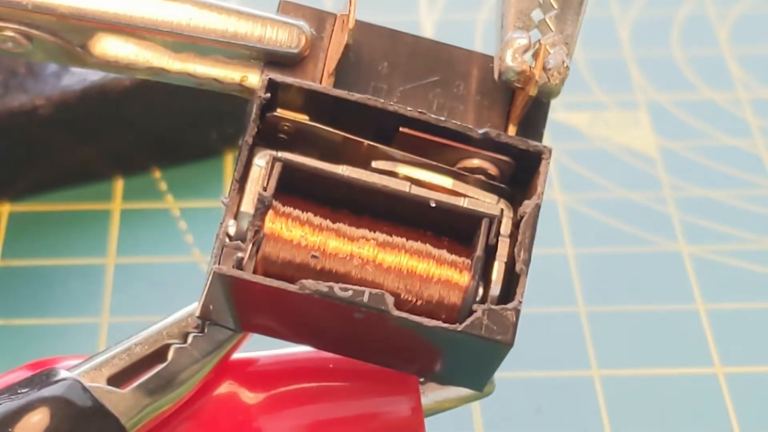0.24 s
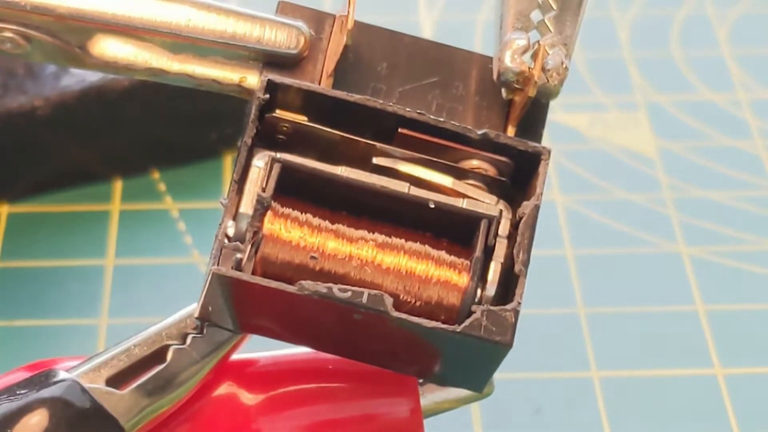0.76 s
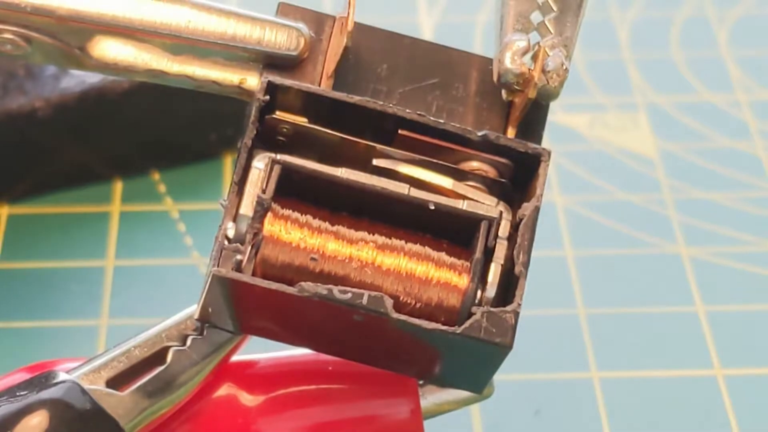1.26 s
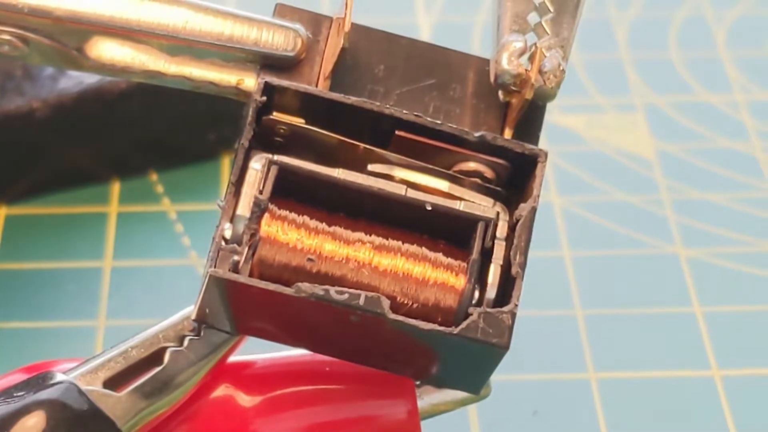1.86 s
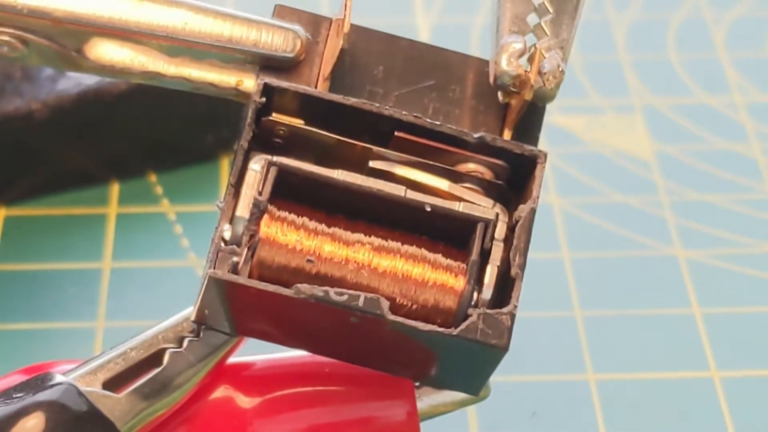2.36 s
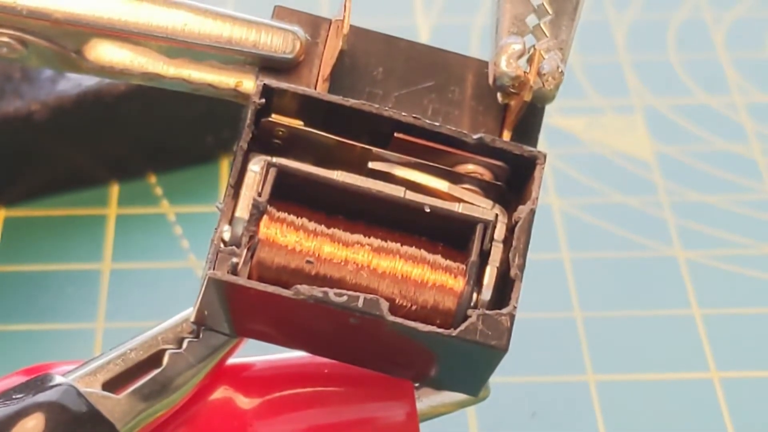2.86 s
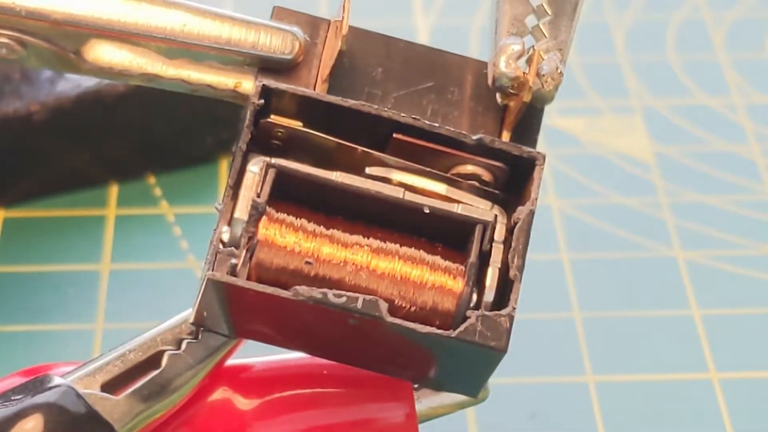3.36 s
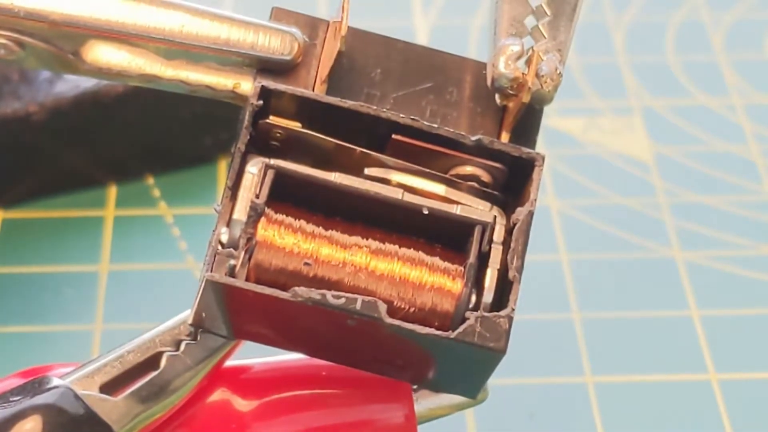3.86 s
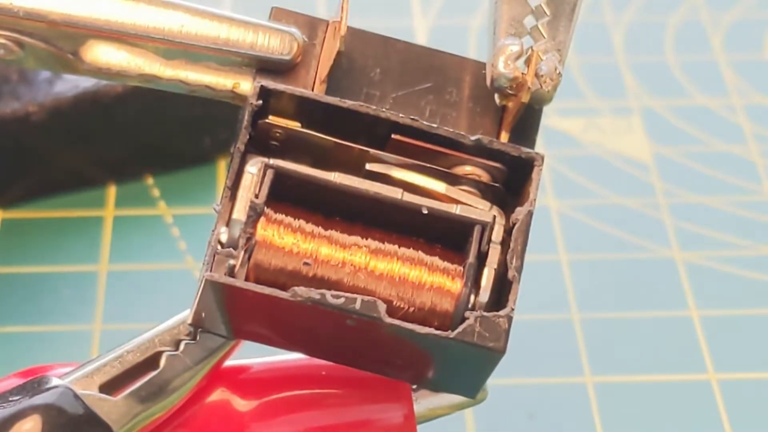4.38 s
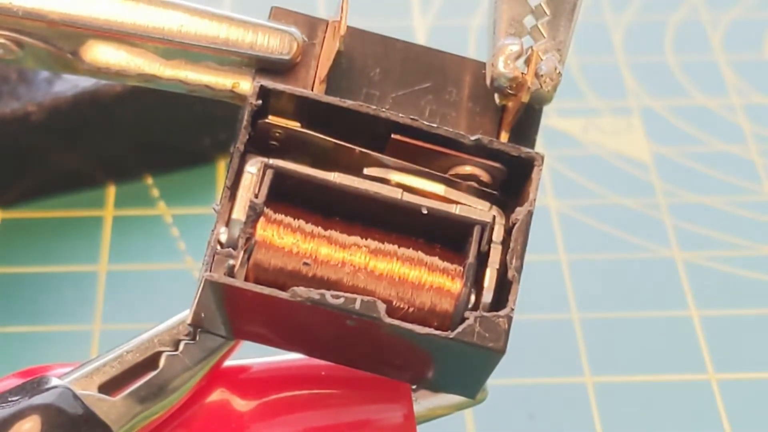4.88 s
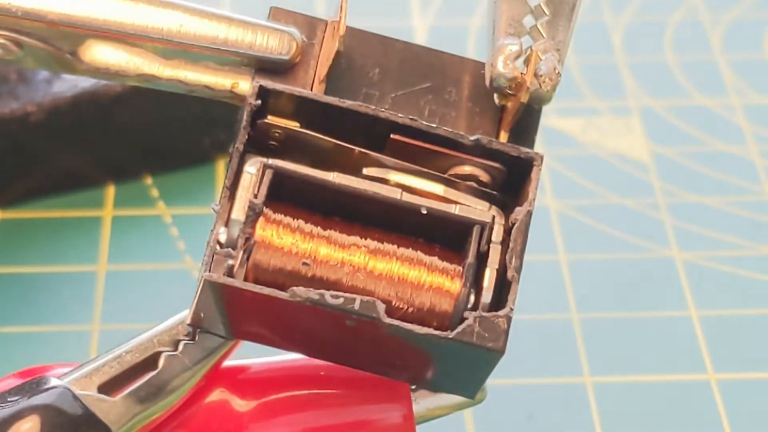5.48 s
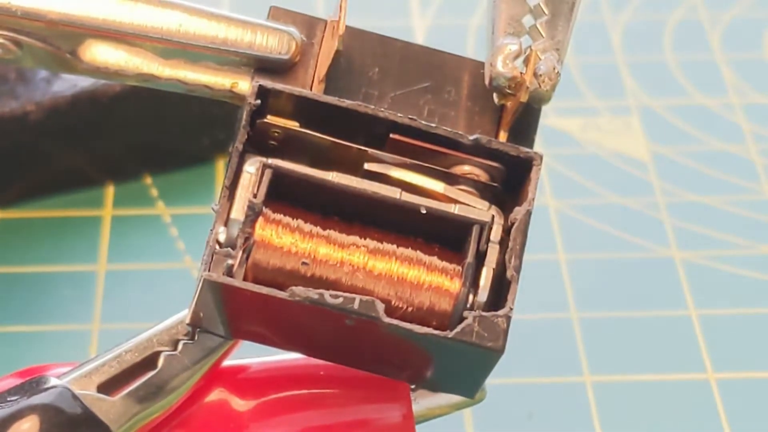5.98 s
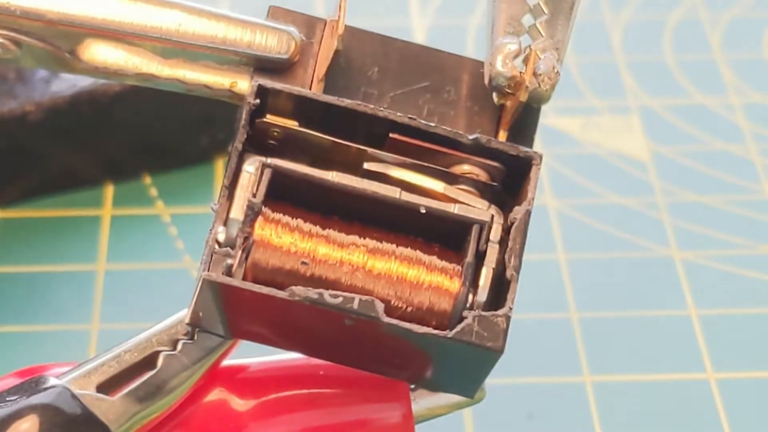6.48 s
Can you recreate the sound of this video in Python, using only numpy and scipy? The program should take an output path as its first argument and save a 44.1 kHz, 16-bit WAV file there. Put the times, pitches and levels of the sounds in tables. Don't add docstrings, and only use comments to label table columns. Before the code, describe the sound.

A fan drones evenly in a small, hard room while a push switch and relay click close to two spaced microphones. Each of four cycles lasts just over a second: sharp switch snap, tinny armature slam with ringing small parts, quieter thuddy switch release, then a dry clack with quick bounces. The opening pair is heaviest, with a low bench thump; short pauses leave only drone and faint hiss.

```python
import sys
import numpy as np
from scipy import signal
from scipy.fft import rfft, irfft, next_fast_len
from scipy.io import wavfile
from scipy.ndimage import uniform_filter1d, map_coordinates

SR = 44100
rng = np.random.default_rng(int(sys.argv[2]) if len(sys.argv) > 2 else 0)


def int16_out(signal):
    q = np.round(np.clip(np.atleast_2d(signal).T, -1, 1) * 32767)
    wavfile.write(sys.argv[1], SR, q.astype(np.int16))


def magnitude_from_level(level_db):
    exponent = np.asarray(level_db, float) / 20
    return 10 ** exponent


N = 296793
CLICK_N = 22050
AHEAD_N = 2000
SPACING_N = 20
JOINT_HZ, TOP_HZ = 6300, 15900
FAN_DB, HISS_DB = -43, -68
EARLY_DB, SETTLE_S, SETTLE_SPREAD_S = 4, 1.3, 0.037

# f/Hz, density/(dB per Hz)
FAN_COLOUR = [(32, -42), (55, -20), (85, -35), (103, -16.5), (167, -10.5), (202, -10.5), (233, -10.5),
              (353, -10.5), (385, -13.5), (545, -1.5), (595, -7), (827, -15), (1020, -14.5), (1570, -18.5),
              (3500, -42), (4550, -45), (7700, -120)]
# f/Hz, width/Hz, level/dB
DUCT_MODES = [(119.2, 8.2, 7.5), (171.9, 16.6, 11), (230.7, 14.4, 10.5), (306.5, 66, 4), (539.5, 29, 7),
              (636, 20.4, 8.5), (824, 28, 8.5), (1580, 15.5, 9), (2330, 34, 11.5)]
# f/Hz, density/(dB per Hz)
HISS_COLOUR = [(1470, -51), (2500, 2), (3710, -4.5), (4410, -5), (7030, -5.5), (9130, -13), (11500, -11),
               (15700, -23), (16500, -37.5)]
# f/Hz, share/1
AIR_SHARE = [(60, .82), (170, .88), (300, .86), (450, .72), (540, .9), (700, .55), (1000, .9), (1300, .85),
             (1900, .5), (3000, .2), (8000, .15)]
# f/Hz, phase/rad
AIR_LEAD = [(30, .05), (400, .2), (540, .35), (700, 1.1), (850, 2.1), (1000, 3), (1500, 3.6), (2240, 6.6),
            (3500, 6)]
# f/Hz, level/dB
AIR_BALANCE = [(200, 0), (500, 1), (1600, 1.2), (2100, -1.5), (3500, 1), (6000, .2)]
# f/Hz, level/dB rms
MAINS_LINES = [(45, -74.5)]
# t/s, level/dB, length/s
HAND_BRUSH = [
    (3.874, -65, .05),
]

# t/s, peak level/dB, bench knock re peak/dB, noise swell ahead/s, brightness/(dB per octave)
PRESS_EVENTS = [
    (0.5439, -16.5, -20.5, 0.021, -2.5),
    (2.171, -18.5, -58, 0.0034, 1.5),
    (3.986, -20, -45.5, .025, 2.5),
    (5.6634, -20.5, -55, .021, 1.5),
]
PULL_EVENTS = [
    (0.7265, -23.5, 2, 0.015, 0.073),
    (2.3153, -23.5, -35, 0.025, 0.1),
    (4.131, -23, -39, 0.024, 0.1),
    (5.8112, -24, -18, 0.011, 0.16),
]
RELEASE_EVENTS = [
    (1.237, -36.5, 9, 0.02, 0.1),
    (2.9614, -37.5, 12.5, 0.029, 0.1),
    (4.655, -37.5, 11, 0.015, 0.1),
    (6.377, -37.5, 12, 0.022, 0.1),
]
DROP_EVENTS = [
    (1.487, -25.5, -14, 0.028, 0.1),
    (3.2163, -25.5, -15, 0.028, 0.1),
    (4.9292, -25, -10.5, 0.019, 0.1),
    (6.6313, -25, -17.5, 0.028, 0.1),
]

# t after first/s, level/dB
PRESS_CONTACTS = [
    (0, -8),
    (.0013, 3),
    (.003, -5),
    (.0055, -10),
    (.009, -14),
]
PULL_CONTACTS = [
    (0, 4),
    (.0012, 2),
    (.0028, -4),
    (.009, -9),
    (.017, -13),
    (.026, -14),
    (.055, -20),
]
RELEASE_CONTACTS = [
    (-.002, -8),
    (0, 1),
    (.003, 0),
    (.007, -3),
    (.012, -5),
    (.018, -7),
]
DROP_CONTACTS = [
    (0, 2),
    (.0015, 1),
    (.0055, 1),
    (.009, -4),
    (.013, -1),
    (.017, -6),
]

# f/Hz, density/(dB per Hz)
PRESS_CRACK = [(1470, -37), (2500, -16), (3270, -22), (3680, -19.5), (4700, -4.5), (5900, -3.5),
               (6400, -8.5), (7980, -1), (8770, -4.5), (14000, -11.5), (15700, -22.5), (16500, -34.5)]
PULL_CRACK = [(590, -70), (1000, -17), (1950, -6), (2680, -2.5), (2910, 4), (3160, -5.5), (4820, -6.5),
              (7010, -3.5), (8360, -4.5), (14000, -15), (15900, -32), (16500, -68)]
RELEASE_CRACK = [(3120, -6), (5300, -7.5), (9020, 1.5), (10100, 1), (15100, -4.5), (16100, -9),
                 (16500, -37)]
DROP_CRACK = [(1290, -57), (2200, -21), (2760, -6), (3240, -31), (4540, -8.5), (6360, -7), (7040, 1),
              (8840, -4.5), (10700, 0), (12500, -5), (13600, -5), (16000, -15), (16500, -36.5)]

# f/Hz, level/dB, t60/s
PRESS_MODES = [(5300, -2, 0.026), (5610, -20, 0.13), (6750, -7.5, 0.038), (7730, -20, 0.043),
               (8100, -15.5, 0.074), (9700, -4, 0.029), (11800, -22, 0.15), (13500, -3.5, 0.023)]
PULL_MODES = [(2480, -24, 0.06), (2810, -30, 0.04), (4650, -15, 0.076), (5420, -20, 0.091),
              (6870, -7, 0.26), (7180, 5.5, 0.05), (7500, -20, 0.21), (8100, -17, 0.43), (7800, -10, 0.28),
              (8800, -4.5, 0.15), (9220, -18, 0.21), (9460, -14.5, 0.19), (11900, -11, 0.1),
              (13800, -19, 0.13)]
RELEASE_MODES = [(5800, -4, 0.027), (7460, -3, 0.033), (8700, 0, 0.065), (11900, -11, 0.053)]
DROP_MODES = [(5400, -13, 0.061), (6920, -5.5, 0.035), (7230, -14, 0.034), (7860, -18, 0.23),
              (9500, -19, .04), (10540, -8, 0.057), (12100, -20, .06), (14100, -6, .04)]

# f/Hz, density/(dB per Hz)
PRESS_BENCH = [(71, -43), (120, -7.5), (358, -3.5), (823, 1), (958, -8), (1260, 0.5), (1440, -6.5),
               (1870, -1.5), (3030, -16), (4500, -20), (5850, -46), (9900, -120)]
PULL_BENCH = [(82, -46), (140, -20), (214, -9.5), (461, -10.5), (620, -10), (781, -13), (983, -18),
              (1370, -15.5), (3000, -19), (3900, -67), (6600, -120)]
SOFT_BENCH = [(150, -83), (350, -5), (550, 8), (900, -2.5), (1500, -15.5), (2500, -20.5), (3500, -35)]

# f/Hz, t60/s
BENCH_DECAY = [(110, 0.19), (180, 0.16), (400, 0.031), (1500, 0.047), (4000, 0.098)]
# f/Hz, t60/s
ROOM_DECAY = [(1000, 0.29), (3000, 0.33), (7500, 0.39), (11000, 0.29), (16000, 0.2)]
# t/s, f/Hz, level/dB, t60/s
BENCH_THUDS = [
    (.76, 118, -39, 0.61),
    (.727, 186, -23, 0.17),
    (.546, 338, -22, 0.063),
]
# f/Hz, width/Hz, level/dB
BENCH_REFLECTION = [(6200, 500, -2), (8620, 340, -8.5), (9950, 460, -4), (12800, 610, -1.5),
                    (14900, 450, 4), (16400, 900, -3)]


def along(points, hz):
    f, v = np.transpose(points)
    return np.interp(np.log(hz + 1), np.log(f + 1), v)


def bells(table, hz):
    return sum(db / (1 + ((hz - c) / (w / 2)) ** 2) for c, w, db in table)


def unit(x):
    return x / np.sqrt(np.mean(x ** 2) + 1e-20)


def filtered(x, response):
    m = next_fast_len(x.shape[-1] + 8192)
    spectrum = rfft(x, m) * response(np.fft.rfftfreq(m, 1 / SR))
    return irfft(spectrum, m)[..., :x.shape[-1]]


def wobble(rate_hz, count=N):
    knots = rng.standard_normal(int(count * rate_hz / SR) + 4)
    return map_coordinates(knots, [np.arange(count) * rate_hz / SR])


def pair(alike, count):
    a, b = rng.standard_normal((2, count))
    turn = np.arccos(np.clip(alike, -1, 1)) / 2
    return np.array([np.cos(turn) * a + np.sin(turn) * b, np.cos(turn) * a - np.sin(turn) * b])


def air(colour):
    shared, left, right = rng.standard_normal((3, N))

    def share(hz):
        return np.clip(along(AIR_SHARE, hz), 0, 1)

    def turn(hz):
        return np.exp(.5j * along(AIR_LEAD, hz) * [[1], [-1]])

    both = filtered(shared, lambda hz: colour(hz) * np.sqrt(share(hz)) * turn(hz))
    both = both + filtered(np.array([left, right]), lambda hz: colour(hz) * np.sqrt(1 - share(hz)))
    both = filtered(both, lambda hz: magnitude_from_level(along(AIR_BALANCE, hz) / 2 * [[1], [-1]]))
    return both / np.sqrt(np.mean(both.mean(axis=0) ** 2))


def fan():
    t = np.arange(N) / SR
    drone = air(lambda hz: magnitude_from_level(along(FAN_COLOUR, hz) + bells(DUCT_MODES, hz)))
    drone = drone * magnitude_from_level(FAN_DB + 0.74 * wobble(7))
    early_db = EARLY_DB / (1 + np.exp((t - SETTLE_S) / SETTLE_SPREAD_S))
    hiss = air(lambda hz: magnitude_from_level(along(HISS_COLOUR, hz))) * magnitude_from_level(HISS_DB + early_db)
    mains = sum(magnitude_from_level(db) * np.sqrt(2) * np.sin(2 * np.pi * hz * t + .3 * wobble(3)) for hz, db in MAINS_LINES)
    stroke = sum(magnitude_from_level(db) * np.exp(-((t - at) / (length / 2)) ** 2) for at, db, length in HAND_BRUSH)
    brush = stroke * filtered(pair(.5, count=N), lambda hz: hz ** 2 / (hz ** 2 + 6600.0 ** 2))
    return drone + mains + hiss + brush


def causal(x, colour, size=2048):
    gain = magnitude_from_level(along(colour, np.fft.rfftfreq(size, 1 / SR)))
    cepstrum = irfft(np.log(np.maximum(gain, 1e-4)))
    cepstrum[1:size // 2] *= 2
    cepstrum[size // 2 + 1:] = 0
    kernel = irfft(np.exp(rfft(cepstrum)))
    return signal.fftconvolve(x, kernel[None] / np.linalg.norm(kernel), axes=1)[:, :x.shape[1]]


def patchy(x, depth_db):
    z = signal.stft(x, nperseg=256)[2]
    field = uniform_filter1d(rng.standard_normal(z.shape[1:]), size=3, axis=0)
    field = uniform_filter1d(field, size=5, axis=1)
    return signal.istft(z * magnitude_from_level(depth_db * unit(field)), nperseg=256)[1][:, :x.shape[1]]


def dying(t60s, alike):
    hz, t, z = signal.stft(pair(alike, count=CLICK_N), SR, nperseg=256)
    decay = magnitude_from_level(-60 * t / along(t60s, hz)[:, None])
    tail = signal.istft(z * decay, SR, nperseg=256)[1][:, :CLICK_N]
    return tail / np.linalg.norm(tail[0])


def echoes(x):
    tail = dying(ROOM_DECAY, alike=.25) * (1 - np.exp(-np.arange(CLICK_N) / SR / .007))
    return signal.fftconvolve(x, tail, axes=1)[:, :CLICK_N]


def ringing(modes, contacts, t, scatter_db, rough):
    hz, db, t60_s = np.transpose(modes)[..., None]
    energy = sum(magnitude_from_level(hit_db - 60 * np.abs(t - s) / t60_s) ** 2 * np.clip((t - s) / 0.00016, 0, 1)
                 for s, hit_db in contacts)
    size = magnitude_from_level(db + scatter_db * rng.standard_normal((2, len(modes), 1))) * np.sqrt(energy)
    wander = rough * np.cumsum(rng.standard_normal((2, len(modes), len(t))), axis=2)
    cycles = hz * t + rng.random((2, len(modes), 1))
    return (size * np.sin(2 * np.pi * cycles + wander)).sum(axis=1)


def clicks(events, contacts, colour, modes, bench_colour, crack_t60_s, rattle_t60_s, push_s, rattle_db, lead_db,
           pan_db, size_db, ring_db, knock_db, wet_db, gain_db, alike, rough):
    out = np.zeros((2, N + CLICK_N))
    t = (np.arange(CLICK_N) - AHEAD_N) / SR
    for s, db, bench_db, lead_s, tilt_db in events:
        blows = np.array(contacts) + [0, 1.2] * rng.standard_normal((len(contacts), 1))
        shake = 0
        for at, hit_db in blows:
            crack = magnitude_from_level(hit_db - 60 * np.abs(t - at) / crack_t60_s) ** 2
            rattle = magnitude_from_level(hit_db + rattle_db - 60 * np.abs(t - at) / rattle_t60_s) ** 2
            shake = shake + (crack + rattle) * (t >= at)
        click = causal(np.sqrt(shake) * patchy(pair(alike, count=CLICK_N), depth_db=3), colour)
        click = click * magnitude_from_level(1.1 * np.clip(t / 0.0045, 0, 1) * wobble(147.3, count=CLICK_N))
        ring = magnitude_from_level(ring_db) * ringing(modes, blows, t, scatter_db=3, rough=rough)

        tilt = [(2000, -2 * tilt_db), (16000, tilt_db)]
        click, ring = causal(click, tilt), causal(ring, tilt)
        scale = magnitude_from_level(size_db) / np.linalg.norm((click + ring).mean(axis=0))
        click, ring = click * scale, ring * scale

        knock = causal(dying(BENCH_DECAY, alike=0.46), bench_colour)
        knock = np.pad(knock, ((0, 0), (AHEAD_N, 0)))[:, :CLICK_N]
        knock[1] = np.roll(knock[1], SPACING_N)
        click = click + magnitude_from_level(bench_db + knock_db + 29.0) * knock * np.clip(t / push_s, 0, 1)

        room = patchy(echoes(click + ring / 3), depth_db=3)
        click = (click + ring) * magnitude_from_level([[pan_db / 2], [-pan_db / 2]]) + magnitude_from_level(wet_db) * room

        swell = np.clip((lead_s + t) / 0.011, 0, 1) * (t < 0) * (1 + 1.7 * np.exp(-np.abs(t) / 0.0042))
        smear = causal(pair(alike, count=CLICK_N), colour)
        low_smear = causal(pair(alike, count=CLICK_N), bench_colour)
        smear = smear + magnitude_from_level(bench_db + knock_db + 4.0) * low_smear
        start = round(s * SR) - AHEAD_N
        out[:, start:start + CLICK_N] += magnitude_from_level(db + gain_db) * (click + magnitude_from_level(lead_db) * swell * smear)
    return out[:, :N]


def switch():
    down = clicks(PRESS_EVENTS, PRESS_CONTACTS, PRESS_CRACK, PRESS_MODES, PRESS_BENCH,
                  crack_t60_s=0.0026, rattle_t60_s=0.065, push_s=.0015, rattle_db=-10.5, lead_db=-25.5,
                  pan_db=-0.5, size_db=15.5, ring_db=-7.5, knock_db=14, wet_db=-15.0, gain_db=1.86,
                  alike=0.083, rough=.11)
    up = clicks(RELEASE_EVENTS, RELEASE_CONTACTS, RELEASE_CRACK, RELEASE_MODES, SOFT_BENCH,
                crack_t60_s=0.0085, rattle_t60_s=0.042, push_s=0.011, rattle_db=-5, lead_db=-25,
                pan_db=-.3, size_db=23, ring_db=-1.0, knock_db=-0.5, wet_db=0, gain_db=-3.5,
                alike=0.97, rough=.13)
    return down + up


def bench():
    t = np.arange(N) / SR
    out = np.zeros(N)
    for s, hz, db, t60_s in BENCH_THUDS:
        since = np.maximum(t - s, 0)
        onset = 1 - np.exp(-since / 0.0099)
        out += magnitude_from_level(db - 60 * since / t60_s) * np.sin(2 * np.pi * hz * since) * onset
    return out


def armature():
    pull = clicks(PULL_EVENTS, PULL_CONTACTS, PULL_CRACK, PULL_MODES, PULL_BENCH,
                  crack_t60_s=0.0034, rattle_t60_s=0.17, push_s=0.0017, rattle_db=-10.5, lead_db=-25,
                  pan_db=-0.2, size_db=25, ring_db=-4.5, knock_db=-3.5, wet_db=-2.5, gain_db=-1.0,
                  alike=0.051, rough=.14)
    drop = clicks(DROP_EVENTS, DROP_CONTACTS, DROP_CRACK, DROP_MODES, SOFT_BENCH,
                  crack_t60_s=0.0028, rattle_t60_s=0.027, push_s=.004, rattle_db=-6.5, lead_db=-27,
                  pan_db=-1.0, size_db=18.0, ring_db=-9.0, knock_db=-2.5, wet_db=-13.0, gain_db=2.5,
                  alike=-0.19, rough=.07)
    return pull + drop


def scene():
    contacts = filtered(switch() + armature(), lambda hz: magnitude_from_level(bells(BENCH_REFLECTION, hz)))
    return fan() + contacts + bench()


def joint(x, rise_db, size=6):
    mid, side = (x[0] + x[1]) / 2, (x[0] - x[1]) / 2
    hz, _, z = signal.stft(side, SR, nperseg=1024)
    power = uniform_filter1d(np.abs(z) ** 2, size=25, axis=0)
    level_db = 10 * np.log10(np.abs(power) + 1e-20)
    earlier_db = np.pad(level_db, ((0, 0), (size, 0)), mode="edge")[:, :level_db.shape[1]]
    keep = np.where(hz[:, None] > JOINT_HZ, np.clip(level_db - earlier_db - rise_db, 0, 1), 1)
    side = signal.istft(z * keep, SR, nperseg=1024)[1][:N]
    return np.array([mid + side, mid - side])


def low_pass(x):
    return signal.sosfilt(signal.butter(12, 16990, fs=SR, output="sos"), x)


def record(dry):
    x = filtered(dry, lambda hz: 1 / (1 + (hz / TOP_HZ) ** 90) / np.sqrt(1 + (36 / (hz + 1)) ** 8))
    mix = joint(x, rise_db=16.5)
    return low_pass(mix)


dry = scene()
out = record(dry)
int16_out(out)
```